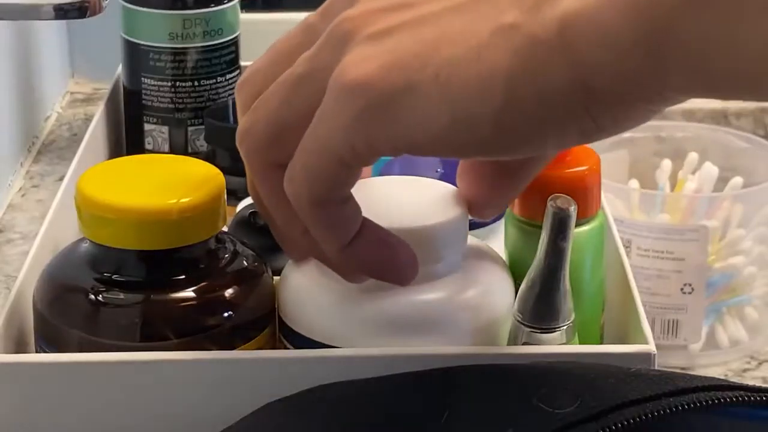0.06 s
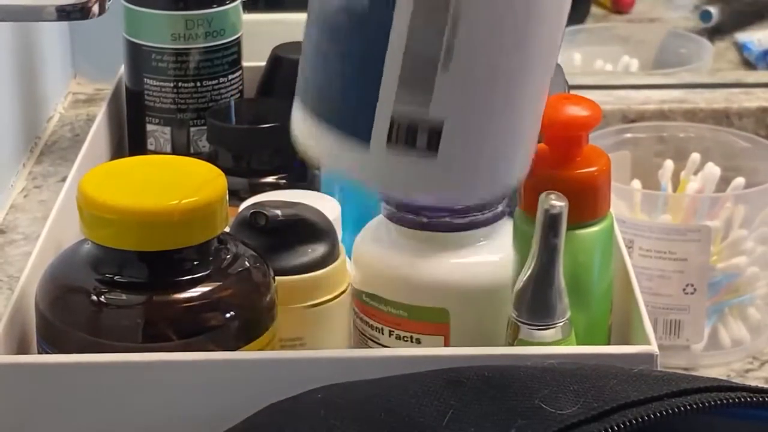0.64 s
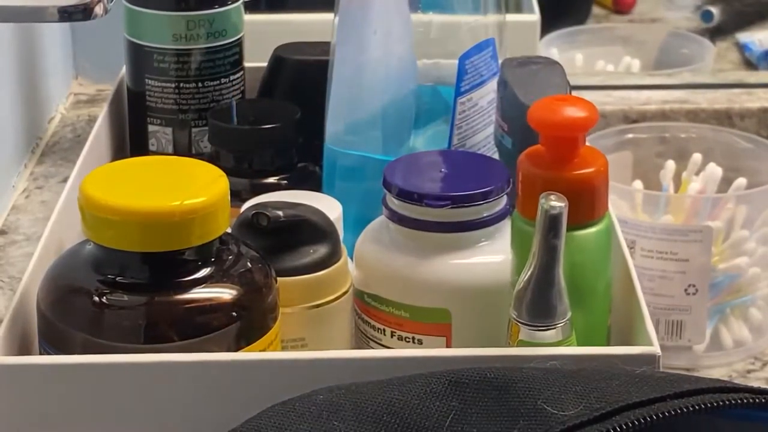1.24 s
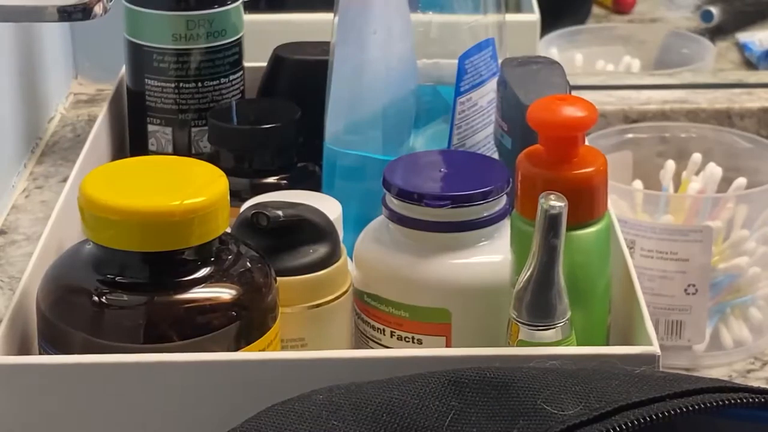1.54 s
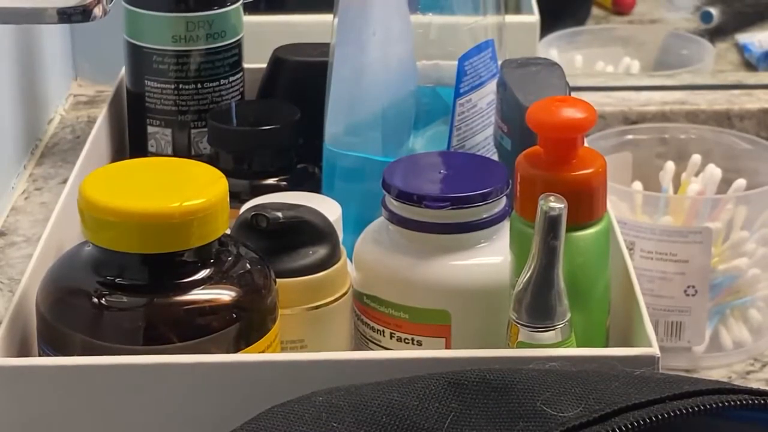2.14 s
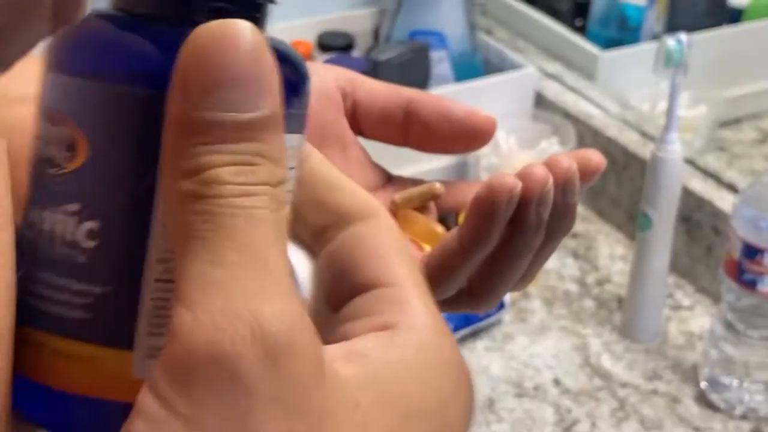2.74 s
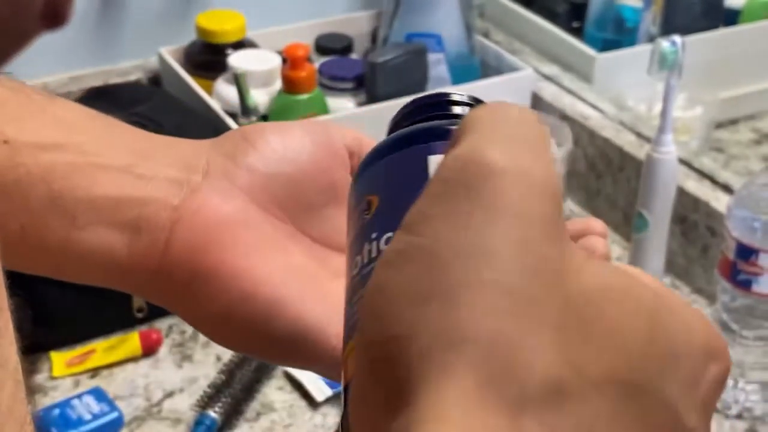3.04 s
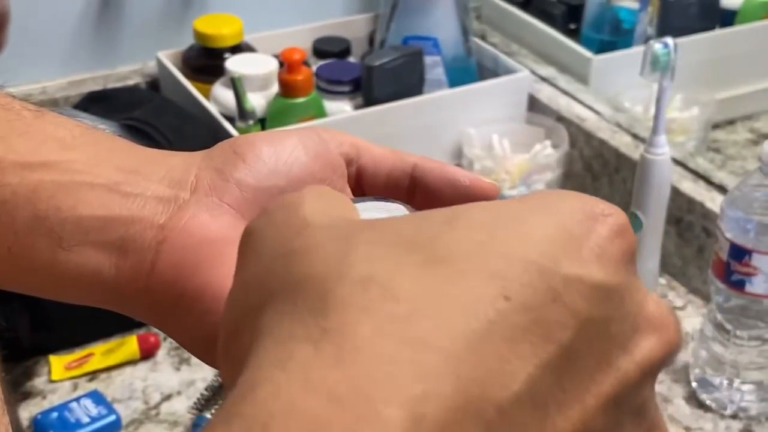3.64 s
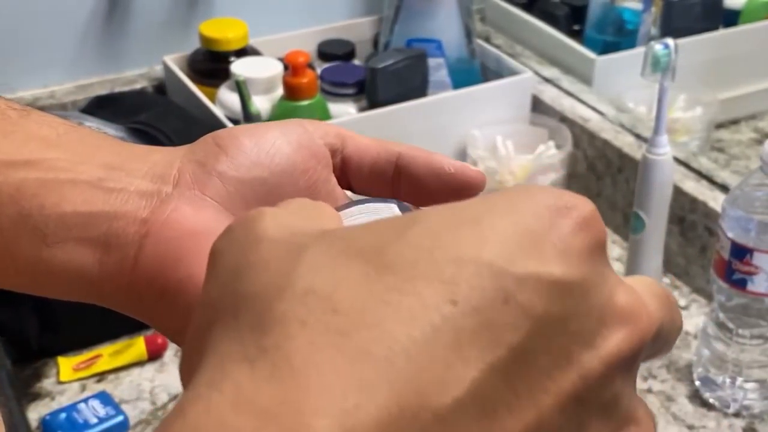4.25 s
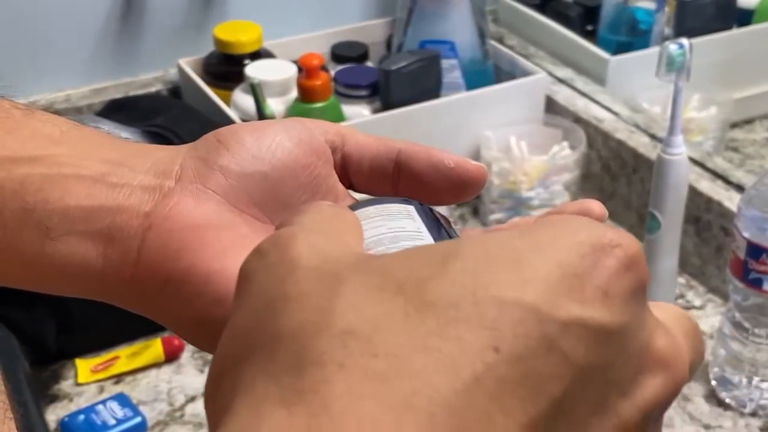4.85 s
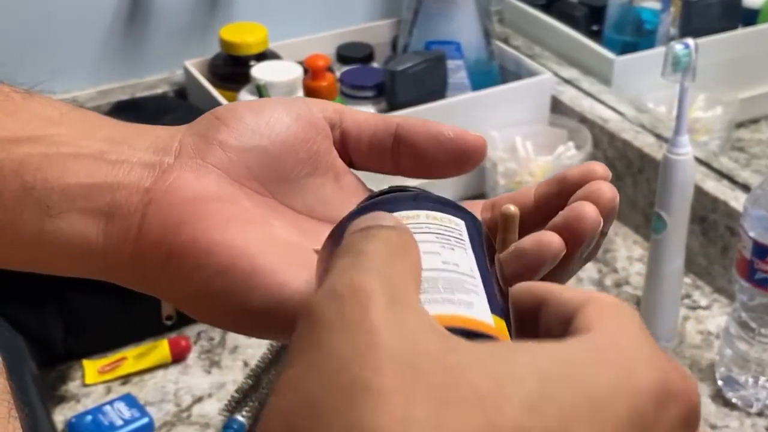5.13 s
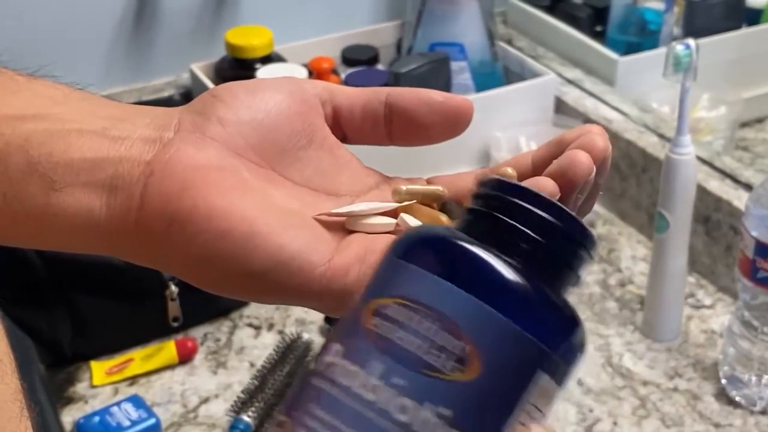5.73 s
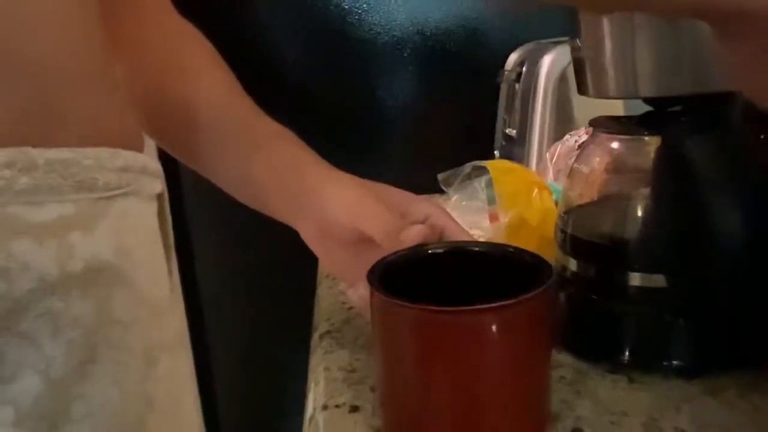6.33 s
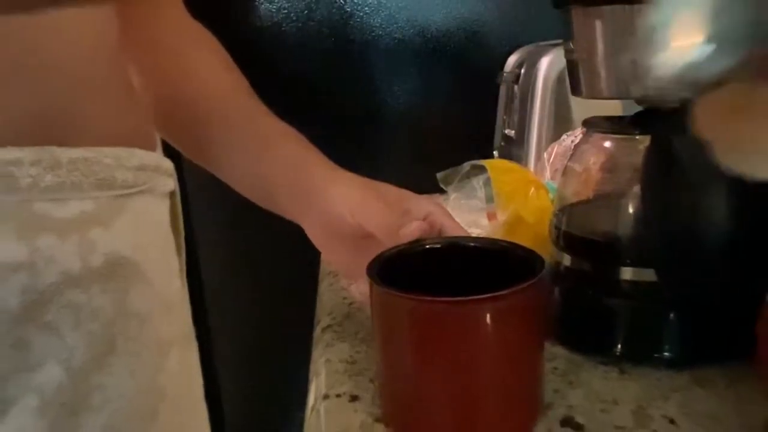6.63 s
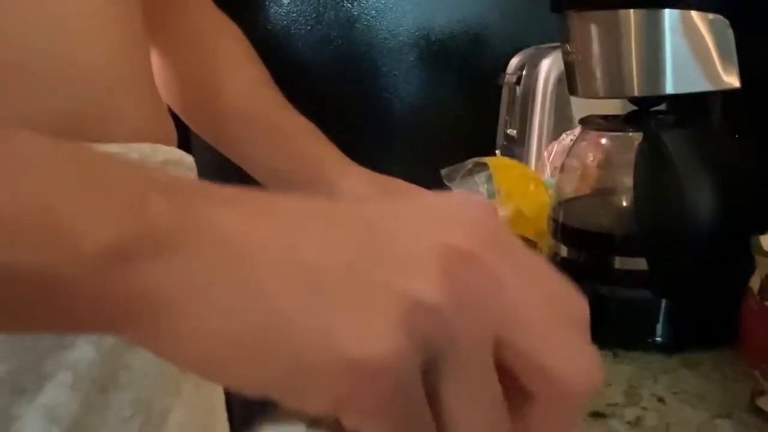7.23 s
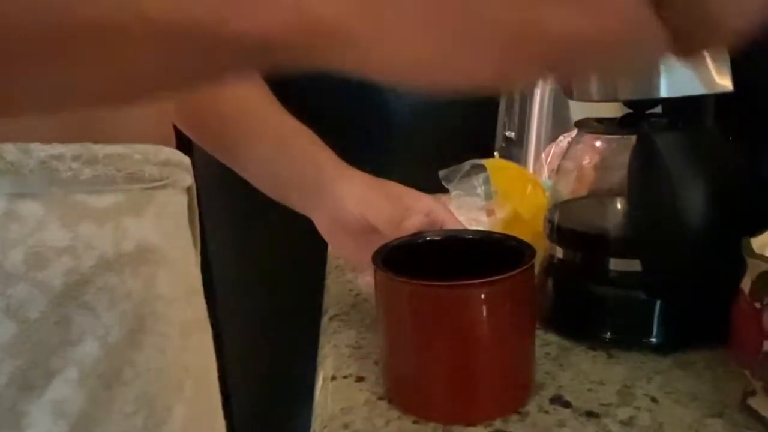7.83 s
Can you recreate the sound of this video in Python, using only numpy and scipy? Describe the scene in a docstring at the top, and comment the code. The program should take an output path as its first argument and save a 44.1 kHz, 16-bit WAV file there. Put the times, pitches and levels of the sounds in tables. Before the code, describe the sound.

Pills rattle in a capped plastic bottle, capsules are shaken from an open one, then a spoon clinks and is set down on stone.

```python
"""Pill bottles in a bathroom, a spoon in a kitchen

Close up at a bathroom counter, on a two-port stereo microphone: a plastic bottle slides out of a tray
and pills rattle in a capped bottle. Capsules are shaken from an open bottle into a palm, the air in its
neck hooting along, and drop back as it is righted. Cut to a kitchen with a humming appliance: a little
to the right, a steel spoon clinks lightly, then is put down on the stone counter with a lid."""
import sys
import numpy as np
from scipy import signal
from scipy.fft import rfft, irfft
from scipy.io import wavfile
from scipy.ndimage import uniform_filter1d

SR = 44100
rng = np.random.default_rng(int(sys.argv[2]) if len(sys.argv) > 2 else 0)


def master(y):
    """Save y as 16-bit WAV."""
    cut = np.clip(np.atleast_2d(y).T, -1, 1)
    pcm = np.round(cut * 32767)  # scale
    wavfile.write(sys.argv[1], SR, pcm.astype(np.int16))


N = 351918
TIME = np.arange(N) / SR
FREQS = np.fft.rfftfreq(N, 1 / SR)

# how alike each room's diffuse sound is in left and right: freq_hz, correlation
BATH_LIKENESS = [(100, 0.53), (450, 0.94), (900, 0.089), (1400, 0.64), (2500, .93), (7000, 1), (10000, .7),
                 (15000, .6)]
KITCHEN_LIKENESS = [(60, 0.85), (200, 1), (500, 0.38), (1000, 0.22), (2500, 0.086), (15000, .1)]


def amp(db):
    """Decibels to gain."""
    return 10 ** (np.asarray(db) / 20)


def unit(x):
    """Scales to rms 1."""
    return x / np.sqrt(np.mean(x ** 2) + 1e-20)


def read(points, hz):
    """Reads a table on a log-frequency axis."""
    f, value = np.transpose(points)
    return np.interp(np.log(hz + 1), np.log(f + 1), value)


def level(rows):
    """Gain over time from rows of time_s, gain_db; silent outside them."""
    s, db = np.transpose(rows)
    return amp(np.interp(TIME, s, db, left=-150, right=-150))


def add(mix, start_s, sound):
    """Mixes a sound in at start_s."""
    part = mix[round(start_s * SR):][:len(sound)]
    part += sound[:len(part)]


def colour(x, points):
    """Filters by rows of freq_hz, gain_db."""
    return irfft(rfft(x) * amp(read(points, FREQS)), N)


def pair(x, likeness):
    """Blends two unrelated signals into partly alike left and right."""
    a, b = rfft(x, N)
    same = np.clip(read(likeness, FREQS), 0, 1)
    return irfft(np.array([a, same * a + np.sqrt(1 - same ** 2) * b]), N)


def resonate(x, hz, width_hz):
    """A resonance of gain 1 that follows the curve hz."""
    turn = np.exp(2j * np.pi * np.cumsum(hz) / SR)
    pole = np.exp(-np.pi * width_hz / SR)
    return 2 * (turn * signal.lfilter([1 - pole], [1, -pole], x / turn + 1e-18)).real


def moves(rows, attack_share, settle_db_per_s):
    """Gain over time of movements: each builds up (long ones slowly), swells or sags, then settles."""
    power = np.zeros(N)
    for start, length, db, swell_db in rows:
        t = TIME[:SR] - attack_share * length
        rise = np.clip(1 - t / t[0], 0, 1) ** 2
        held_db = db + swell_db * np.clip(t / length, 0, 1)
        settled_db = settle_db_per_s * np.maximum(t - length, 0)
        add(power, start + t[0], (rise * amp(held_db - settled_db)) ** 2)
    return np.sqrt(power)


def shell_ring(shell, modes, hollow_db=0, crack_db=0, size=4096):
    """Response of a struck object: broad colour lifted at its resonances, shaded by the contact."""
    hz = np.fft.rfftfreq(size, 1 / SR)
    lift = 1 + sum((amp(db) ** 2 - 1) / (1 + (2 * (hz - f) / width) ** 2) for f, width, db in modes)
    contact_db = read([(780, 0), (1200, hollow_db), (1500, hollow_db), (2000, 0.019), (3900, 0.0038),
                       (4800, crack_db), (7500, crack_db), (11000, crack_db / 2)], hz)
    gain = amp(read(shell, hz) + contact_db) * np.sqrt(abs(lift))
    log_gain = np.log(np.r_[gain, gain[-2:0:-1]] + 1e-6)
    return np.fft.ifft(np.exp(signal.hilbert(log_gain).conj())).real  # minimum phase


def hits(rows, shell, modes, chatter=0, chatter_s=1, size=1024):
    """Each blow on the wall is a click, with or without a brief chatter of neighbouring pills."""
    out, t = np.zeros(N), TIME[:size]
    for start, db, hollow_db, crack_db in rows:
        force = chatter * rng.standard_normal(size) * np.exp(-(t / chatter_s) ** 2)
        force[0] += 1
        blow = signal.fftconvolve(force, shell_ring(shell, modes, hollow_db, crack_db))
        add(out, start, amp(db) * blow / np.linalg.norm(blow))
    return out


def tumble(motion, shell, modes, per_s, spread_db, crack_db, spots=6, contact_s=0.00069):
    """Many small collisions, at spots of the wall that each ring a little differently."""
    kicks = amp(spread_db * np.minimum(rng.exponential(1, N), 3.5)) * rng.choice([-1, 1], N)
    kicks *= rng.random(N) < per_s / SR
    kicks /= np.sqrt(abs(uniform_filter1d(kicks ** 2, size=1800)) + 1e-4)  # the heap shares its energy
    spot = rng.integers(0, spots, N)
    out, t = np.zeros(N), TIME[:256]
    for k in range(spots):
        contact = rng.standard_normal(len(t)) * np.exp(-t / contact_s)
        wall = shell_ring(shell, modes, 2 * rng.normal(), crack_db + 2 * rng.normal())
        ring = unit(signal.fftconvolve(contact, wall))
        out += signal.oaconvolve(kicks * (spot == k), ring)[:N]
    return unit(out) * motion


def diffuse_noise(spectrum, likeness):
    """Steady coloured noise from all around, partly alike in left and right."""
    return unit(colour(pair(rng.standard_normal((2, N)), likeness), spectrum))


def reverb(x, t60, likeness, gap_s, size=22050):
    """Dense reflections after a short gap, each band dying at its own speed."""
    hz, t, bands = signal.stft(rng.standard_normal((2, size)), SR, nperseg=256)
    tail = signal.istft(bands * amp(-60 * t / read(t60, hz)[:, None]), SR, nperseg=256)[1]
    tail *= np.clip(TIME[:tail.shape[1]] / gap_s - 1, 0, 1)
    response = pair(tail / np.linalg.norm(tail[0]), likeness)[:, :size]
    return signal.fftconvolve(x[None], response, axes=1)[:, :N]


def appliance_hum():
    """Three steady low tones from a kitchen appliance."""
    # pitch_hz, gain_db
    tones = [(96.9, -81.5), (183.0, -71), (414.5, -78)]
    hum = sum(amp(db) * np.sqrt(2) * np.sin(2 * np.pi * (hz * TIME + rng.random())) for hz, db in tones)
    return amp(-4.0) * hum


def handling():
    """Low rumble of handling that swells and fades."""
    # its course: time_s, gain_db
    course = [(0, -62.5), (.3, -53), (.8, -53), (1.5, -61), (2.7, -57.5), (3.1, -70.5), (5.96, -78)]
    # its colour: freq_hz, gain_db
    spectrum = [(20, -29), (38, -15), (60, 6.5), (85, -8.5), (120, -1), (170, -15.5), (250, -7),
                (340, -26.5), (700, -29.5), (1500, -57), (4000, -75)]
    return amp(-1.5) * diffuse_noise(spectrum, likeness=[(50, 0.35), (200, 0.92)]) * level(course)


def hand_brush():
    """Soft rustle of the hand drawing back from the counter."""
    # start_s, length_s, gain_db, swell_db
    strokes = [(7.59, 0.17, -78, -7)]
    spectrum = [(1000, -25), (4500, -12), (6800, 5), (9000, -13), (12000, -6), (14000, -27)]
    hiss = unit(colour(rng.standard_normal(N), spectrum))
    return hiss * moves(strokes, attack_share=0.38, settle_db_per_s=199.5)


def squeak(pitch_hz=5700, width_hz=260):
    """The lifted bottle squeaks faintly against its neighbour."""
    # plastic on plastic: start_s, length_s, gain_db, swell_db
    rubs = [(.33, 0.073, -68, 0)]
    pitch = np.full(N, pitch_hz)
    band = resonate(rng.standard_normal(N), pitch, width_hz)
    whistle = unit(resonate(band, pitch, width_hz))
    return whistle * moves(rubs, attack_share=0.6, settle_db_per_s=145)


def closed_motion():
    """How hard the pills churn in the capped bottle."""
    # shifts of the heap: start_s, length_s, gain_db, swell_db
    shifts = [(1.113, 0.12, -50.5, -5.5), (1.3, 0.16, -45, -9), (1.49, 0.1, -35.5, -9.5),
              (1.58, 0.069, -33.5, -4), (1.69, 0.094, -55, -8), (1.965, 0.04, -53.5, -3),
              (2.065, 0.059, -50.5, -2)]
    return moves(shifts, attack_share=0.15, settle_db_per_s=249.5)


def open_motion():
    """How hard the capsules churn in the open bottle."""
    # tilts and shakes: start_s, length_s, gain_db, swell_db
    shakes = [(2.355, 0.24, -53.5, 8), (2.51, .14, -38, 3.5), (2.72, 0.063, -37, -3.5),
              (2.84, 0.082, -50.5, 10), (2.98, 0.12, -55, -7), (3.15, 0.19, -75, 23.5),
              (3.36, 0.088, -38.5, -6), (3.53, 0.073, -43, 4), (3.7, 0.095, -43.5, -10),
              (3.88, 0.1, -49.5, 11.5), (4.0, .125, -48, 5), (4.18, 0.078, -61.5, 3),
              (4.41, 0.094, -64.5, 1), (4.58, 0.052, -48, -7.5), (4.705, 0.26, -40, -18),
              (4.99, 0.088, -66.5, -6), (5.27, 0.15, -63.5, -2), (5.41, 0.038, -46, 5),
              (5.46, .08, -34, -6), (5.75, 0.063, -57.5, -4), (5.89, 0.091, -76, 21.5)]
    return moves(shakes, attack_share=0.17, settle_db_per_s=270)


def sliding(grain_db=3):
    """Fine, grainy hiss of smooth surfaces rubbing: slides, and a little with every tumble."""
    # plastic and capsules sliding: start_s, length_s, gain_db, swell_db
    slides = [(.034, 0.0046, -64.5, -7), (.28, 0.25, -66.5, 11), (.56, 0.063, -60.5, 0),
              (2.075, 0.036, -55.5, -2.5), (2.72, 0.01, -49.5, -14), (3.14, 0.27, -63, -15),
              (3.37, 0.28, -57, -1.5), (3.73, 0.29, -54.5, -1), (4.046, .008, -48.5, 0),
              (4.43, 0.12, -69, -6), (4.62, .28, -61, 3), (5.2, 0.28, -71, 11), (5.75, 0.085, -62, -10.5)]
    # colour of the friction: freq_hz, gain_db
    spectrum = [(200, -7.5), (900, -5), (2500, -1), (4000, -4), (7000, 3.5), (9000, 4), (12000, -2),
                (16000, -6.5)]
    slips = rng.standard_normal(N)
    slips *= amp(grain_db * unit(uniform_filter1d(rng.standard_normal(N), size=40)))
    rubbing = moves(slides, attack_share=0.28, settle_db_per_s=332)
    rubbing += amp(-19) * closed_motion() + amp(-26) * open_motion()
    return amp(4.5) * unit(colour(slips, spectrum)) * rubbing


def tray_bumps(size=8192):
    """Dull, scuffing bumps of bottles against the tray, their neighbours and the hand."""
    # start_s, gain_db, pitch_hz, decay_s
    bumps = [(.236, -49, 1004, 0.024), (0.257, -39.5, 640, 0.012), (.380, -43, 1140, 0.013),
             (0.614, -41, 448, 0.023), (0.625, -38, 520, 0.021), (0.769, -49.5, 193, 0.012),
             (.829, -58, 1060, 0.047), (0.937, -50.5, 1880, 0.0057), (1.538, -30, 189, 0.017),
             (1.584, -36.5, 227, 0.017), (1.96, -45, 170, 0.039), (2.088, -41.5, 380, 0.011),
             (3.966, -55.5, 395.4, .015), (5.46, -50, 108.7, 0.061)]
    # resonances of the bottles in the tray: freq_hz, width_hz, lift_db
    modes = [(255, 15, 0.5), (550, 40, -0.5), (1370, 52, 6.5)]
    out, t = np.zeros(N), TIME[:size]
    for start, db, hz, decay in bumps:
        scuff = rng.standard_normal(size) * np.exp(-t / decay)
        bump = signal.lfilter(*signal.butter(1, [hz / 1.9, hz * 1.38], "band", fs=SR), scuff)
        bump = signal.lfilter(*signal.butter(1, hz * 2, fs=SR), bump)
        add(out, start, amp(db) * bump / abs(bump).max())
    return signal.oaconvolve(out, shell_ring([(100, -2.3), (8000, -1.2)], modes))[:N]


def bottle_knocks(attack_s=0.0025):
    """A bottle knocked as a whole gives a short hollow note."""
    # start_s, gain_db, pitch_hz, t60_s
    knocks = [(.626, -49, 645, 0.091), (.628, -53, 1393, 0.2), (1.579, -43, 347, .2),
              (2.088, -37.5, 358, 0.11)]
    out, t = np.zeros(N), TIME[:SR // 2]
    for start, db, hz, t60 in knocks:
        envelope = amp(db - 60 * t / t60) * (1 - np.exp(-t / attack_s))
        add(out, start, envelope * np.sin(2 * np.pi * hz * t))
    return out


def counter_knocks(attack_s=0.0012, crack_s=0.008):
    """Lid and spoon land on stone: hollow knocks, each with a short crack."""
    # start_s, gain_db, pitch_hz, length_s, crack_db
    blows = [(6.356, -45.5, 620, 0.015, -6.5), (6.9527, -8.5, 929, 0.005, -20.5),
             (6.965, -16.5, 775, 0.005, -4.5)]
    # colour of the crack: freq_hz, gain_db
    spectrum = [(30, -31.5), (80, -18.5), (140, 7.5), (250, -12.5), (420, 12.5), (1100, 10.5), (2000, 3.5),
                (4000, 0), (6000, -12.5), (8500, -15.5), (10000, -35), (16000, -28.5)]
    # steel ringing under a hard crack: freq_hz, width_hz, lift_db
    modes = [(8630, 300, 12), (11550, 161, 13), (14480, 82, 30.5)]
    knocks, cracks, t = np.zeros(N), np.zeros(N), TIME[:SR // 8]
    for start, db, hz, length, crack_db in blows:
        envelope = amp(db) * np.exp(-(t / length) ** 2) * (1 - np.exp(-t / attack_s))
        add(knocks, start, -envelope * np.sin(2 * np.pi * hz * t))
        burst = np.exp(-(t / crack_s) ** 2) * rng.standard_normal(len(t))
        add(cracks, start, amp(db + crack_db) * burst)
    return knocks + signal.oaconvolve(cracks, shell_ring(spectrum, modes))[:N]


def spoon(contact_s=0.0014):
    """The steel rings in its bending modes, cut short when it is pressed against something."""
    # bending modes: freq_hz, gain_db, t60_s
    modes = [(2718, -22.5, 0.14), (2775, -10, 0.3), (2784, -6, 0.39), (6770, 8, 0.12), (6650, -5, 0.088),
             (11520, -3.5, 0.091), (14200, -20.5, .06)]
    # clinks: start_s, gain_db, tilt_db_per_octave, share_of_free_ring_time
    clinks = [(6.264, -63, 2, 1), (6.296, -48, 6, 0.19), (6.305, -56.5, 6, 0.28), (6.315, -45, 3, 0.61),
              (6.364, -39, -4, 0.72), (6.953, -32, -1, 0.24), (6.9647, -8.5, -9, 0.081),
              (6.987, -30, -16.5, .5)]
    # a light scrape: time_s, gain_db
    scrape = [(6.262, -79), (6.267, -69), (6.28, -58), (6.3, -55), (6.325, -56.5), (6.345, -68),
              (6.366, -52.5), (6.385, -79)]
    out, t = np.zeros(N), TIME[:SR // 2]
    attack = 1 - np.exp(-(t / contact_s) ** 2)
    for start, db, tilt_db, free in clinks:
        for hz, mode_db, t60 in modes:
            ring_db = db + mode_db + tilt_db * np.log2(hz / 2800) - 60 * t / (t60 * free)
            add(out, start, attack * amp(ring_db) * np.sin(2 * np.pi * hz * t))
    # scraping keeps the same modes buzzing, heavily damped
    damped_modes = [(hz, 90, 23.5 + db) for hz, db, _ in modes]
    rubbed = shell_ring([(200, 12.5), (1500, 4), (16000, -10.0)], damped_modes)
    buzz = unit(signal.oaconvolve(rng.standard_normal(N), rubbed)[:N])
    return out + buzz * level(scrape)


def closed_bottle():
    """Pills strike the wall of a well filled, capped bottle: a dense rattle with a dull body."""
    # loudest knocks: start_s, gain_db, hollow_db, crack_db
    knocks = [(1.113, -33, 7, 5), (1.142, -28, 6, -2), (1.158, -33, -11.5, -4.5), (1.194, -28, -2.5, -0.5),
              (1.3, -28, -6, -1.5), (1.31, -20, 3, -1.5), (1.37, -33.5, 10, 10), (1.453, -22, -6, 2.5),
              (1.487, -20.5, 1, 4), (1.53, -19.5, 4.5, 6.5), (1.577, -16.5, -1.5, -2.5),
              (1.598, -15, -22, 0.5), (1.615, -16, 1, -2.5), (1.636, -17.5, -3, 4), (1.654, -20.5, 5.5, 7),
              (1.748, -31, 7.5, -4), (1.967, -42, 9, 14), (2.087, -28.5, 32, -6), (2.1, -31, 3, 6)]
    # broad colour of the bottle: freq_hz, gain_db
    shell = [(30, -44.5), (100, -8.5), (250, -23), (600, -13), (1000, -9.5), (1600, -5), (2300, 3),
             (3300, -11.5), (5000, -10), (7000, -9.5), (8500, -21), (12000, -19), (16000, -40)]
    # resonances of the bottle, the air inside at 350 Hz and the wall above it: freq_hz, width_hz, lift_db
    modes = [(350, 6.1, 19.5), (2360, 280, 1.5), (4480, 79, 2)]
    blows = hits(knocks, shell, modes, chatter=0.28, chatter_s=0.014)
    heap = tumble(closed_motion(), shell, modes, per_s=1200, spread_db=-0.5, crack_db=-0.5)
    return amp(11.0) * blows + amp(-1.5) * heap


def open_bottle(neck_width_hz=19, free_neck_hz=501):
    """Capsules knock and roll; the air inside hoots along, lower as the palm covers the neck."""
    # loudest knocks: start_s, gain_db, hollow_db, crack_db
    knocks = [(2.353, -33.5, -4.5, 1), (2.379, -30, -14, -15), (2.438, -33, -6, -3),
              (2.506, -23, -21, -2.5), (2.547, -21.5, -9.5, 4.5), (2.577, -21, 4, 6.5),
              (2.61, -20.5, -4, 0.5), (2.63, -17, 3, 6), (2.72, -27, -6, -1), (2.764, -26.5, 0, 12),
              (2.837, -29, 12, 4.5), (2.885, -27.5, 10, -18), (2.904, -25.5, 28, -21),
              (2.919, -16.5, -8, 2.5), (3.113, -36, 11.5, 1), (3.377, -25.5, 2, 10), (3.391, -23, 5.5, -10),
              (3.424, -23.5, -19, 2.5), (3.516, -16, 2.5, -9.5), (3.578, -19.5, -4.5, 7),
              (3.6, -21.5, 3, 8.5), (3.621, -22, -10.5, -1.5), (3.7, -39, 10, -14), (3.758, -23, -2.5, -5),
              (3.861, -22, 3, -5), (3.886, -17, -1, -9), (3.927, -20, 1.5, -13.5), (3.947, -12, -23.5, 4),
              (4.115, -22.5, -5, -15), (4.216, -32.5, -11, -17), (4.57, -37, -3, -4),
              (4.698, -19.5, -15, 6.5), (4.752, -19.5, -3.5, -8), (4.816, -31.5, 1.5, 6),
              (4.846, -28.5, -1, -26), (4.895, -21, -1.5, 7.5), (4.921, -25, -9, 0), (5.093, -48, 2.5, -11),
              (5.407, -34.5, 13, 6.5), (5.45, -5.5, 3, 5.5), (5.508, -11, 6, 1.5), (5.744, -25, 2, 4)]
    # broad colour of the bottle: freq_hz, gain_db
    shell = [(30, -53), (100, -36.5), (250, -26), (380, -15.5), (520, -13), (800, -10), (1300, -4.5),
             (2200, 0), (3000, -2), (4200, -8), (5200, -7.5), (7300, -10.5), (8700, -14.5), (12000, -19.5),
             (16000, -30)]
    # wall resonances: freq_hz, width_hz, lift_db
    modes = [(1384, 150, 8.4), (2206, 100, 5.6), (2814, 91, 5.8), (3465, 70, 6.3), (3947, 160, 7.6),
             (5300, 30, 3.4), (7200, 170, 2.5)]
    # resonance of the air in the neck: time_s, pitch_hz, coupling_db
    neck = [(2.4, 448, 21.5), (2.68, 394, 25.5), (2.95, 515, 7), (3.4, 484, 21.5), (3.6, 452, 24),
            (4.0, 467.8, 21.5), (4.199, 459, 18), (4.8, 484, 18.5), (5.448, 490.5, 17.5), (5.8, 496, 25)]
    # higher modes of the air inside, with the neck free: freq_hz, width_hz, gain_db
    air_modes = [(1391, 40, 4.5), (2256, 26, 3), (2910, 52, -3)]
    # the neck tapped against the palm: start_s, length_s, gain_db, swell_db
    taps = [(3.965, 0.0113, -36.5, -0.5)]
    blows = hits(knocks, shell, modes, chatter=0.31, chatter_s=0.0081)
    pushes = hits(knocks, shell, modes)  # the air feels each knock as one push
    heap = amp(-6.0) * tumble(open_motion(), shell, modes, per_s=950, spread_db=2.5, crack_db=-1.0)
    drive = amp(11.0) * pushes + heap
    times, pitches, coupling_db = np.transpose(neck)
    neck_hz = np.interp(TIME, times, pitches)
    coupling = amp(np.interp(TIME, times, coupling_db))
    hoot = resonate(drive * coupling, neck_hz, neck_width_hz)
    stretch = (neck_hz / free_neck_hz) ** 0.74  # the higher modes bend less than the neck note
    cavity = sum(amp(db) * resonate(drive, hz * stretch, width) for hz, width, db in air_modes)
    neck_tone = np.sin(2 * np.pi * np.cumsum(neck_hz) / SR)
    pop = neck_tone * moves(taps, attack_share=0.58, settle_db_per_s=165)
    return amp(10.5) * blows + heap + cavity + pop + hoot


def microphone_ports(sound):
    """Each frequency reaches the two ports with its own difference in phase and level."""
    # freq_hz, left_lead_rad
    phase = [(100, 1), (2000, 0), (3200, .7), (5200, 0.71), (5900, 0.36), (6500, 0.5), (7900, 0.5),
             (8150, 2), (9000, 2.08), (10500, 0.3), (11400, -0.8), (13400, -3.1), (14200, -4.5),
             (15300, -4.5)]
    # freq_hz, left_minus_right_db
    balance = [(100, -1), (400, 1), (900, 2.5), (1400, 2), (2400, -0.1), (15000, 0)]
    lead_rad = np.interp(FREQS, *np.transpose(phase))
    left = np.exp(0.5j * lead_rad) * amp(read(balance, FREQS) / 2)
    return irfft(rfft(sound) * np.array([left, 1 / left]), N)


def bathroom():
    """Bottles close to the microphone in a small hard room."""
    # reverberation: freq_hz, t60_s
    t60 = [(250, 0.36), (700, 0.34), (2000, 0.21), (5000, 0.21), (14000, 0.16)]
    # room tone: freq_hz, gain_db
    air = [(30, -13.5), (120, 0.5), (400, -10), (1000, -15), (3000, -21.5), (8000, -32), (16000, -44.5)]
    direct = closed_bottle() + open_bottle() + sliding() + squeak() + tray_bumps() + bottle_knocks()
    reflections = amp(-8.5) * reverb(direct, t60, BATH_LIKENESS, gap_s=0.0049)
    background = handling() + amp(-76.5) * diffuse_noise(air, BATH_LIKENESS)
    return microphone_ports(direct + reflections) + background


def kitchen():
    """Spoon and lid a little right of the microphone, over the hum of an appliance."""
    # reverberation: freq_hz, t60_s
    t60 = [(250, 0.4), (700, 0.27), (2800, 0.36), (4500, 0.39), (6800, .27), (14000, 0.33)]
    # room tone: freq_hz, gain_db
    air = [(25, -18.5), (85, -5), (150, -11), (185, -8), (243, -14.5), (354, -9), (440, -18.5), (790, -22),
           (1460, -24.5), (1900, -29.5), (3400, -27.5), (4600, -38), (8000, -47.5), (15000, -58)]
    direct = spoon() + counter_knocks() + hand_brush()
    reflections = amp(-8.5) * reverb(direct, t60, KITCHEN_LIKENESS, gap_s=0.0015)
    background = amp(-70.0) * diffuse_noise(air, KITCHEN_LIKENESS) + appliance_hum()
    return direct * amp([[-2.5], [2]]) + reflections + background


def scene(cut_s=5.97):
    """The bathroom, then a hard cut to the kitchen."""
    return np.where(TIME < cut_s, bathroom(), kitchen())


def record(dry):
    """The recorder passes nothing much above 16 kHz."""
    low_pass = signal.firwin(401, 16000, window=("kaiser", 9), fs=SR)
    return signal.oaconvolve(dry, low_pass[None], "same", axes=1)


dry = scene()
out = record(dry)
master(out)
```